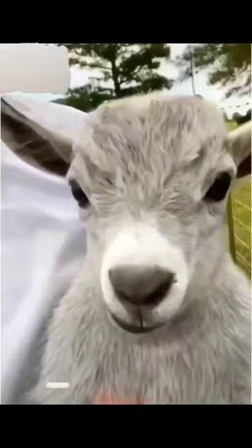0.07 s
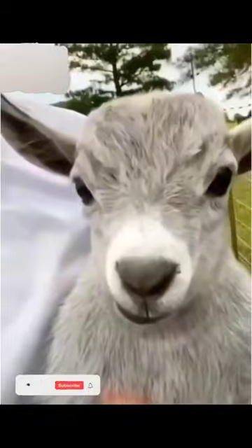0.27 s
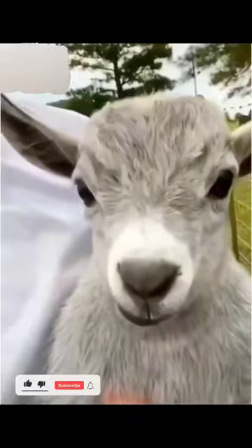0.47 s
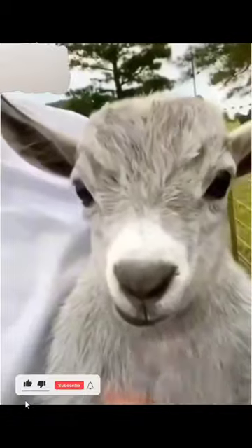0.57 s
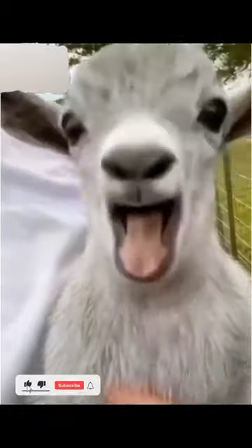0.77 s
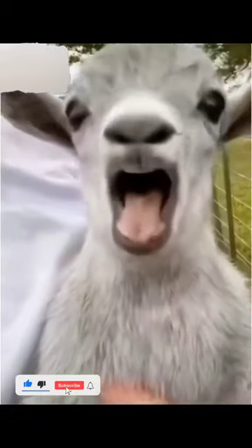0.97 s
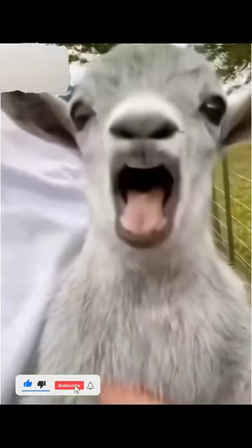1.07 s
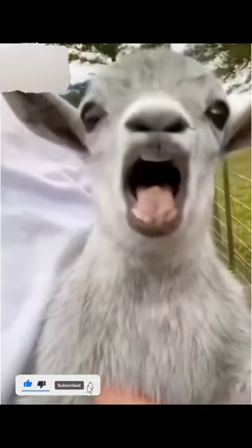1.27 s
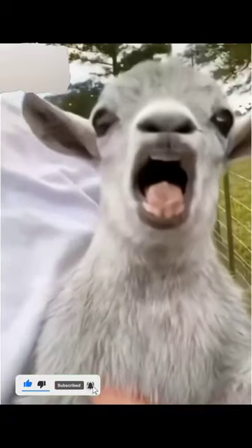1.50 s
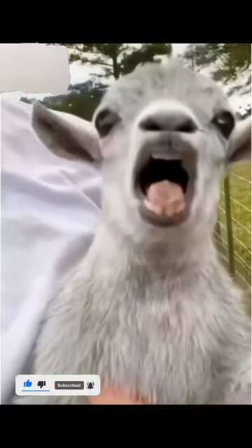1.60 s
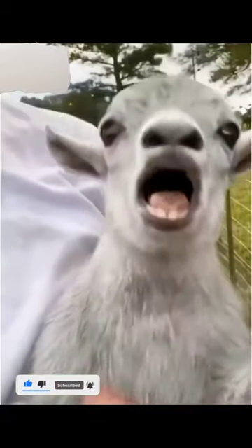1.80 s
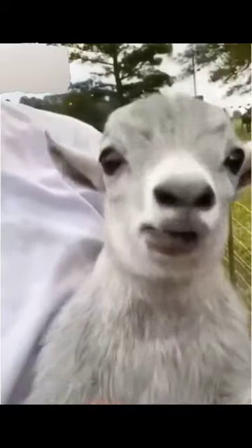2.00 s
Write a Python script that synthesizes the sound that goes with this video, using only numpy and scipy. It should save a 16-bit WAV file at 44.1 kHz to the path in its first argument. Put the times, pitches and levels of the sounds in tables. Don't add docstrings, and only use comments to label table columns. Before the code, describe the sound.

A young goat gives one long, high, scream-like bleat close to a phone microphone outdoors. Before it a small engine putters with faint clanks; the engine drops almost out of hearing once the cry starts.

```python
import sys
import numpy as np
from scipy import signal
from scipy.fft import rfft, irfft, next_fast_len
from scipy.io import wavfile
from scipy.ndimage import uniform_filter1d, map_coordinates

SR = 44100
rng = np.random.default_rng(int(sys.argv[2]) if len(sys.argv) > 2 else 0)


def volts_from_db(level):
    exponent = np.asarray(level, float) / 20
    return 10 ** exponent


def wrap_up_sound(samples):
    columns = np.atleast_2d(samples).T
    tamed = np.clip(columns, -1, 1)
    steps = np.round(tamed * 32767).astype(np.int16)
    wavfile.write(sys.argv[1], SR, steps)


N = 90404
T = np.arange(N) / SR


def unit(x):
    return x / np.sqrt(np.mean(x ** 2) + 1e-20)


def curves(rows):
    s, *columns = np.transpose(rows)
    return [np.interp(T, s, column) for column in columns]


def wobble(rate_hz):
    return map_coordinates(rng.standard_normal(int(N * rate_hz / SR) + 4), [T * rate_hz])


def filtered(x, response):
    m = next_fast_len(N + SR // 2)
    return irfft(rfft(x, m) * response(np.fft.rfftfreq(m, 1 / SR)), m)[..., :N]


def resonances(peaks):
    def response(f):
        total = 0
        for k, (hz, width, db) in enumerate(peaks):
            peak = 1j * f * width / (hz * hz - f * f + 1j * f * width)
            total = total + (-1) ** k * volts_from_db(db) * peak
        return total
    return response


def burst(s, level_db, hz, length_s, width):
    swell = np.exp(-((T - s) / length_s) ** 2)
    return volts_from_db(level_db) * swell * unit(filtered(rng.standard_normal(N), resonances([(hz, width * hz, 0)])))


CYCLE_S = .09168


def firings():
    first_s, jitter_s, strength_db = .032, .0003, .6
    count = int(N / SR / CYCLE_S) + 1
    chance = rng.standard_normal((count, 2))
    times = first_s + CYCLE_S * np.arange(count) + jitter_s * chance[:, 0]
    fire = np.zeros(N + SR)
    fire[np.round(times * SR).astype(int)] = volts_from_db(strength_db * chance[:, 1])
    fire[:round(CYCLE_S * SR)] *= volts_from_db(-11)
    return fire


# pitch_hz, level_db, t60_s, attack_s, delay_s
EXHAUST_MODES = [(232.5, -14.5, 0.062, 0.0047, 0.0023), (147.8, -17, 0.035, 0.0044, 0),
                 (98.4, -11, 0.15, 0.0042, .0172), (66, -16, .1, .005, .014)]


def exhaust(fire):
    t = T[:SR // 4]
    thump = 0
    for hz, db, t60, attack, delay in EXHAUST_MODES:
        age = np.maximum(t - delay, 0)
        envelope = volts_from_db(db - 60 * age / t60) * (1 - np.exp(-age / attack))
        thump = thump + envelope * np.sin(2 * np.pi * hz * age)
    return signal.fftconvolve(fire, thump)[:N]


# pitch_hz, density_db (per Hz)
CLATTER_SPECTRUM = [(280, -43), (480, -4), (1330, -3), (1690, -8.5), (2610, -2.5), (4860, -20.5),
                    (8620, -21.5), (9400, -30.5), (12200, -60), (20700, -120)]


def clatter(noise):
    f, db = np.transpose(CLATTER_SPECTRUM)
    colour = lambda hz: volts_from_db(np.interp(np.log(hz + 1), np.log(f), db))
    return unit(filtered(noise, colour)) * volts_from_db(2.7 * wobble(90))


def outflow(fire):
    delay_s, t60_s = .021, .2
    t = T[:SR // 4]
    decay = (t > delay_s) * volts_from_db(-60 * np.maximum(t - delay_s, 0) / t60_s)
    return signal.fftconvolve(fire, decay)[:N]


# pitch_hz, width_hz, level_db
CASING_MODES = [(220, 110, -6.5), (405, 22, 4.5), (1320, 70, -7.5), (2250, 250, -12), (2640, 100, -17.5)]


def casing(noise, fire, flow):
    valve_s, valve_width_s = .07, .008
    knock = np.exp(-((T[:SR // 4] - valve_s) / valve_width_s) ** 2)
    valve = signal.fftconvolve(fire, knock)[:N]
    ring = unit(filtered(noise, resonances(CASING_MODES))) * volts_from_db(1.4 * wobble(30))
    return ring * (.7 + .5 * flow + .8 * valve)


def hiss(noise, flow):
    jet = unit(filtered(noise, resonances([(7300, 2500, 0)])))
    return jet * flow * volts_from_db(1.9 * wobble(40))


def engine():
    fire = firings()
    flow = outflow(fire)
    noise = rng.standard_normal((3, N))
    rattling = volts_from_db(-42) * clatter(noise[0])
    ringing = volts_from_db(-40) * casing(noise[1], fire, flow)
    return exhaust(fire) + rattling + ringing + volts_from_db(-47) * hiss(noise[2], flow)


# peak_s, level_db, pitch_hz, length_s
LOOSE_PARTS = [
    (.257, -40, 6800, 0.0065),
    (0.297, -53, 2500, 0.013),
    (0.501, -50, 2300, 0.0061),
    (0.573, -34, 2630, 0.015),
]


def loose_parts():
    return sum(burst(*row, .4) for row in LOOSE_PARTS)


# time_s, pitch_hz
FOLD_PITCH = [
    (.605, 597.3),
    (.635, 681.5),
    (.66, 768.7),
    (.7, 814.8),
    (.745, 826),
    (.9, 806.1),
    (1.2, 811.9),
    (1.64, 802.2),
    (1.7, 782),
]


def fold_vibration():
    crack_s, crack_length_s, drop, bend = 1.703, .03, .22, 1.3
    (pitch,) = curves(FOLD_PITCH)
    pitch = pitch * (1 - drop * np.clip((T - crack_s) / crack_length_s, 0, 1.2) ** bend)
    waver = .002 * (wobble(20) + .4 * wobble(90))
    return pitch, 2 * np.pi * np.cumsum(pitch * (1 + waver)) / SR


def side_branch(f):
    hz, width_hz, depth = 2640, 1100, .039
    return (hz ** 2 - f * f + 1j * f * width_hz * depth) / (hz ** 2 - f * f + 1j * f * width_hz)


# pitch_hz, width_hz, level_db
OPEN_THROAT = [(1938, 330, -3), (4444, 510, 2), (6100, 1300, -1.5), (7300, 690, -7.5)]
# time_s, head_turn (0-3, picks among the four stages), narrowing (0-1)
MOUTH_SHAPE = [
    (.635, 1.9, 0.96),
    (.665, 2, 0),
    (.74, 0, 0),
    (.9, 0, 0.09),
    (1.22, 1, 0.02),
    (1.55, 1.73, 0.04),
    (1.69, 2.96, 0.08),
    (1.706, 2.98, 0.15),
    (1.72, 3, 1),
]
# multiple, level_db
STAGE_0 = [(1, -37), (2, -13), (3, -15.5), (4, -12), (5, 0.5), (6, -3), (7, -1), (8, -6.5), (9, -13),
           (10, -14.5), (11, -21.5)]
STAGE_1 = [(1, -42), (2, -13.5), (3, -14.5), (4, -13.5), (5, 0.5), (6, -3), (7, -7), (8, -4), (9, -21.5),
           (10, -17.5), (11, -26)]
STAGE_2 = [(1, -40), (2, -11.5), (3, -9), (4, -13), (5, -2), (6, -4), (7, -1), (8, 2.5), (9, -14.5),
           (10, -17), (11, -14)]
STAGE_3 = [(1, -44), (2, -12), (3, -11), (4, -14), (5, -4), (6, 2), (7, 0), (8, 0), (9, -1.5), (10, -17.5),
           (11, -18)]
# time_s, level_db
BREATH_EFFORT = [
    (.6, -38),
    (.624, -10),
    (.645, -21),
    (.668, -11),
    (.745, -16.5),
    (.8, -13.5),
    (1.17, -16.5),
    (1.5, -23),
    (1.65, -21),
]


def clear_tone(pitch, phase):
    turn, narrow = curves(MOUTH_SHAPE)
    unsettled = phase + .3 * narrow * wobble(300)
    stages = np.array([STAGE_0, STAGE_1, STAGE_2, STAGE_3])[..., 1]
    throat, lowest = resonances(OPEN_THROAT), resonances(OPEN_THROAT[:1])
    tone = 0
    for k in range(1, 12):
        shimmer_db = 1.07 * (wobble(25) + k * .069 * wobble(9))
        level = volts_from_db(np.interp(turn, range(4), stages[:, k - 1]) + shimmer_db)
        spread = .04 * k * k
        wave = np.cos(k * unsettled + np.angle(throat(k * pitch)) + spread)
        lift = 1 + narrow * volts_from_db(32) * np.abs(lowest(k * pitch)) ** 2
        tone = tone + level * wave * lift
    power = uniform_filter1d(uniform_filter1d(tone ** 2, size=300), size=219)
    tone = tone / np.sqrt(np.abs(power) + 1e-9)
    fade_db = 2500 * np.maximum(T - 1.65, 0) ** 2 + 3000 * np.maximum(T - 1.734, 0)
    return volts_from_db(curves(BREATH_EFFORT)[0] - fade_db) * tone


# pitch_hz, width_hz, level_db
PINCHED_THROAT = [(1877, 270, -5.5), (4404, 450, 0.5), (5630, 700, -5), (7260, 530, -13)]
# time_s, level_db
HOARSENESS = [
    (.597, -60),
    (.609, -27),
    (.642, -14),
    (.666, -18),
    (.69, -33),
    (.78, -78),
    (1.6, -78),
    (1.722, -37),
    (1.785, -82),
]


def hoarse_puffs(gate):
    pinched = resonances(PINCHED_THROAT)

    def colour(f):
        breath = .08 * f * f / (f * f + 910 ** 2)
        return side_branch(f) * (pinched(f) * np.abs(pinched(f)) + breath)

    noise = gate * volts_from_db(1.5 * wobble(160)) * rng.standard_normal(N)
    return volts_from_db(curves(HOARSENESS)[0]) * unit(filtered(noise, colour))


# time_s, level_db
RATTLE_LEVEL = [
    (.93, -80),
    (.99, -32),
    (1.06, -34),
    (1.13, -30),
    (1.2, -38),
    (1.27, -50),
    (1.36, -82),
]


def three_cycle_rattle(phase, gate):
    throat = resonances(OPEN_THROAT)

    def colour(f):
        return throat(f) * np.abs(throat(f)) * side_branch(f) + .02 * (f > 450) * (f < 910)

    drift = phase / 3 + .9 * wobble(50)
    thirds = sum(np.cos(drift + k * phase) + np.cos(drift - (k + 1) * phase) for k in range(11))
    rough = unit(thirds * volts_from_db(3 * wobble(40))) + .95 * unit(gate * rng.standard_normal(N))
    return volts_from_db(curves(RATTLE_LEVEL)[0]) * unit(filtered(rough, colour))


def bleat():
    pitch, phase = fold_vibration()
    gate = np.exp(.8 * np.cos(phase))
    voice = clear_tone(pitch, phase) + hoarse_puffs(gate) + three_cycle_rattle(phase, gate)
    return (T > BREATH_EFFORT[0][0]) * (T < HOARSENESS[-1][0]) * voice


# peak_s, level_db, pitch_hz, length_s
GLOTTAL_CRACKS = [
    (.6095, -18.5, 4700, 0.0015),
    (.6195, -17, 2025, .001),
    (.6195, -24, 5650, .0008),
    (1.753, -51, 5000, 0.0038),
]


def glottal_cracks():
    return sum(burst(*row, .15) for row in GLOTTAL_CRACKS)


# time_s, level_db
BACKGROUND_GAIN = [
    (.056, -54),
    (.062, -8),
    (.12, 1),
    (.625, 0),
    (.66, -19),
    (.76, -25.5),
    (1.2, -27.5),
    (1.7, -30),
    (2.05, -30),
]


def scene():
    voice = bleat()
    motor = volts_from_db(curves(BACKGROUND_GAIN)[0]) * engine()
    under = uniform_filter1d(1. * (T > .72) * (T < 1.7), size=2205)
    treble = filtered(motor, lambda hz: 1 / (1 + (1410 / (hz + 1)) ** 8))
    motor = motor - under * (1 - volts_from_db(-11.5)) * treble
    return (voice + motor + loose_parts() + glottal_cracks())[None]


def top_cut(x):
    return signal.sosfilt(signal.butter(12, 10130, fs=SR, output="sos"), x)


def record(dry):
    ceiling, low_hz, top_hz, edge_hz = 1, 45, 9490, 130
    held = dry / (1 + np.abs(dry / ceiling) ** 6) ** (1 / 6)

    def band(hz):
        highpass = 1j * hz / (low_hz + 1j * hz)
        return highpass / (1 + np.exp(np.clip((hz - top_hz) / edge_hz, -50, 50))) ** 2

    return top_cut(filtered(-held, band))


dry = scene()
out = record(dry)
wrap_up_sound(out)
```